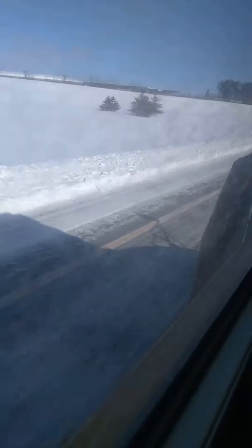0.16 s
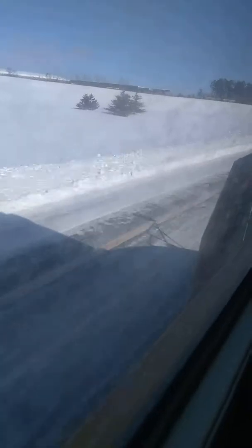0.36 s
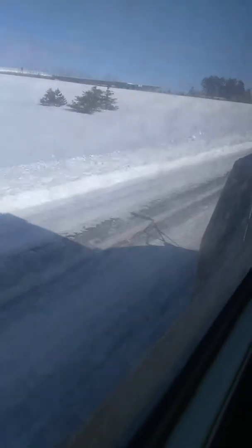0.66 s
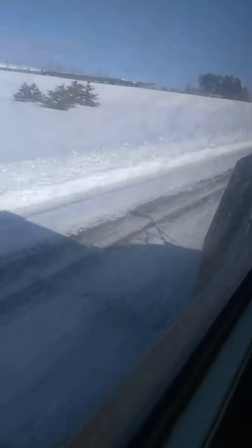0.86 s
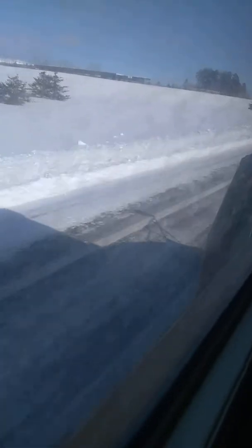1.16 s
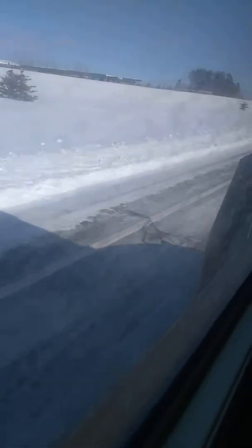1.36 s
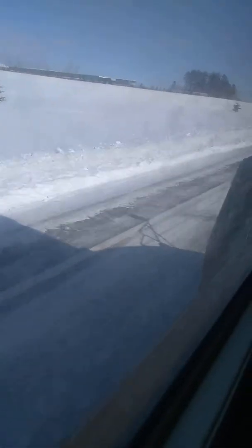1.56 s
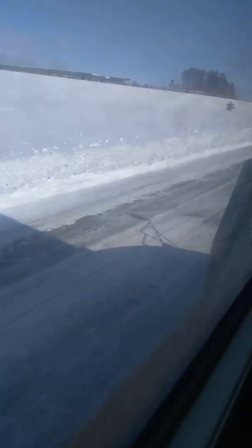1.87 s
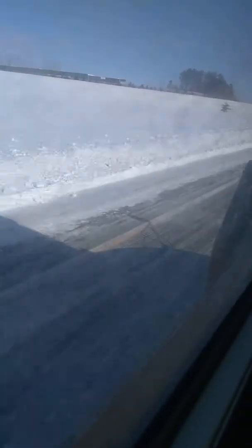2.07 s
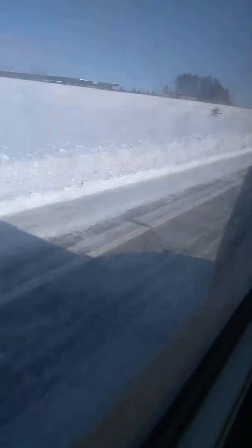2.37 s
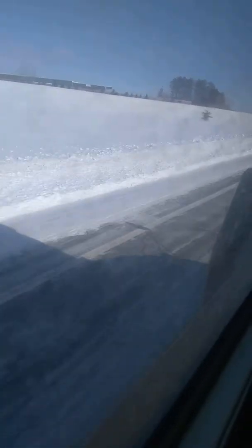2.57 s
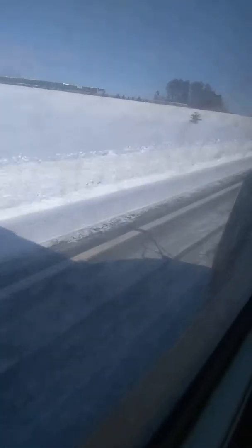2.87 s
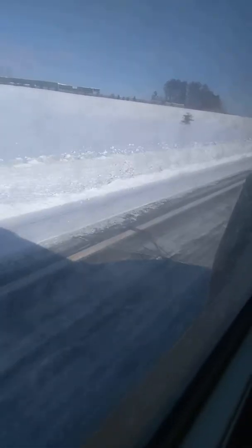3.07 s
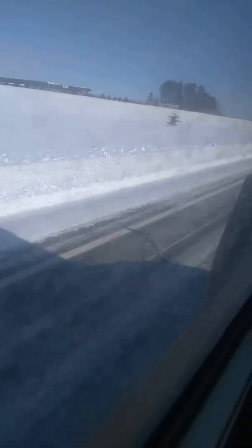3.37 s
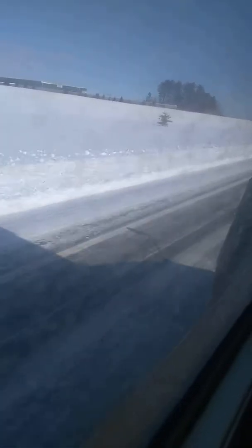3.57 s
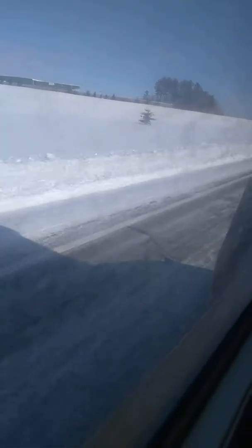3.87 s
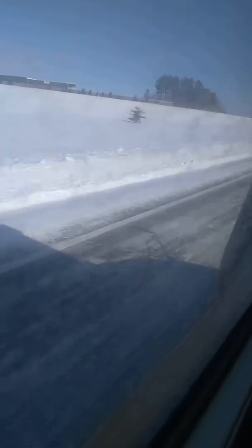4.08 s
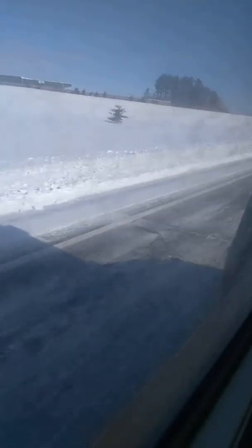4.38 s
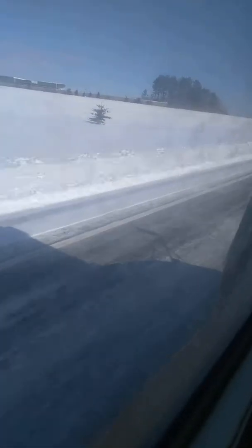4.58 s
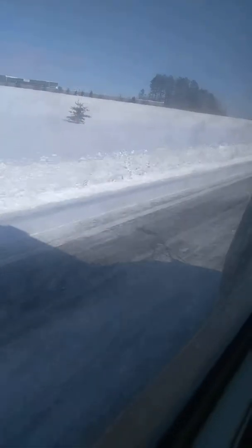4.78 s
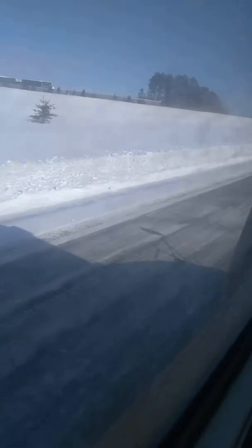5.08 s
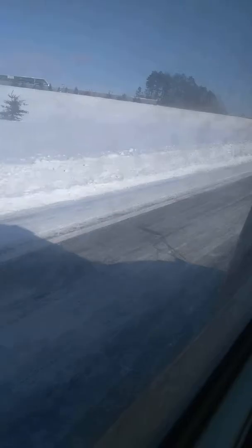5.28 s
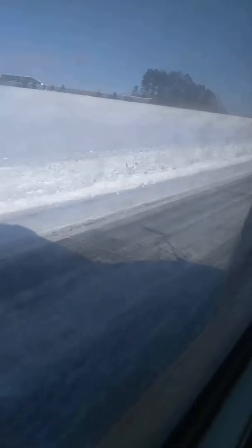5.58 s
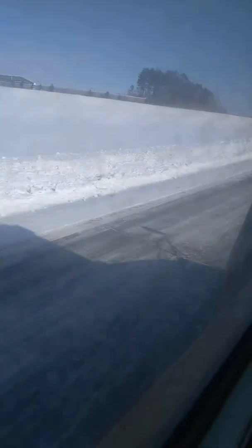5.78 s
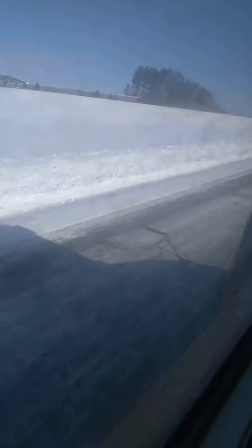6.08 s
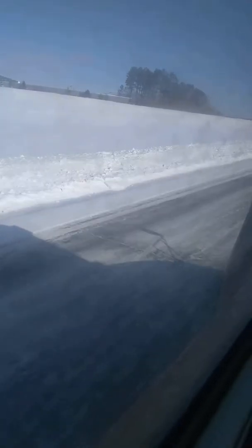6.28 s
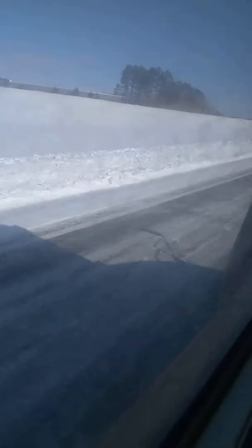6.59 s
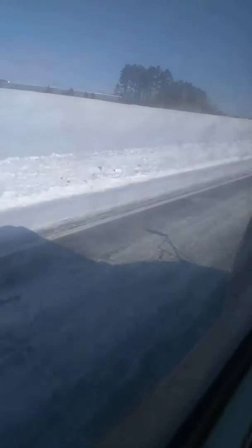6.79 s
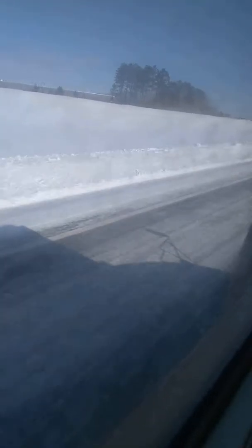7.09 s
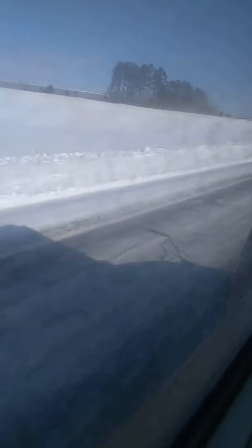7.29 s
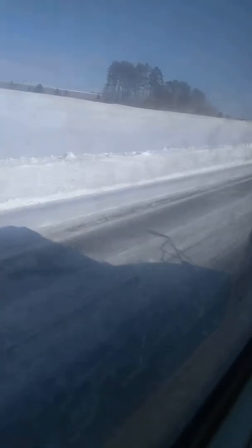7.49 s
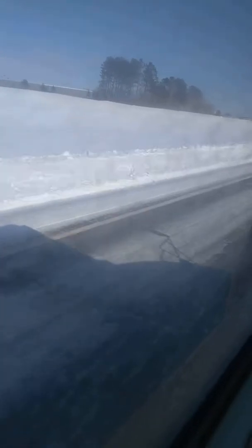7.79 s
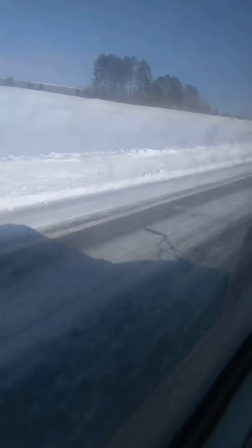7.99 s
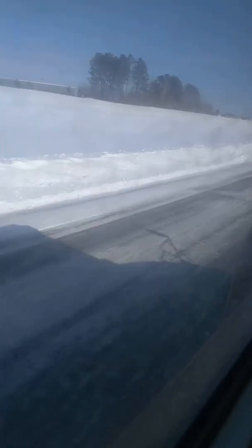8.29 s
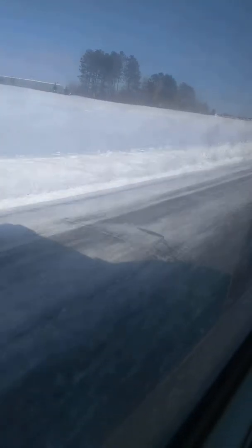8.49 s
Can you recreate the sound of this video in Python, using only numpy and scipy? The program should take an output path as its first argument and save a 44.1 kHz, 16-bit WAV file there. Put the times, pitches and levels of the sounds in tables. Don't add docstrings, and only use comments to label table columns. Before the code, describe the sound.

Inside a bus cruising a snowy highway, steady tyre rumble and engine hum with ticking trim, two sharp grit cracks, then the engine pulling briefly.

```python
import sys
import numpy as np
from scipy import signal
from scipy.fft import rfft, irfft
from scipy.io import wavfile
from scipy.ndimage import uniform_filter1d

SR = 44100
rng = np.random.default_rng(int(sys.argv[2]) if len(sys.argv) > 2 else 0)


def pcm_store(signal):
    levels = np.round(np.clip(np.atleast_2d(signal), -1, 1) * 32767)
    wavfile.write(sys.argv[1], SR, levels.astype(np.int16).T)


def voltage_ratio(decibels):
    exponent = np.asarray(decibels, float) / 20
    return 10 ** exponent


N = 381024


def evened(x):
    return x / np.sqrt(np.mean(x ** 2) + 1e-20)


def read(points, hz):
    f, value = np.transpose(points)
    return np.interp(np.log(hz + 1), np.log(f + 1), value)


def curve(points, t):
    return np.interp(t, *np.transpose(points))


def drift(size):
    return evened(uniform_filter1d(uniform_filter1d(rng.standard_normal(N), size), size))


def resonate(x, hz, width_hz):
    turn = np.exp(2j * np.pi * hz * np.arange(x.shape[-1]) / SR)
    r = np.exp(-np.pi * width_hz / SR)
    return 2 * (turn * signal.lfilter([1 - r], [1, -r], x / turn)).real


def twice_resonated(noise, modes):
    return sum(voltage_ratio(db) * evened(resonate(resonate(noise, hz, width_hz), hz, width_hz))
               for hz, width_hz, db in modes)


def band(x, lo_hz, hi_hz):
    return signal.sosfilt(signal.butter(3, [lo_hz, min(hi_hz, SR / 2 - 100)], "band", fs=SR, output="sos"), x)


def add(mix, s, sound):
    part = mix[:, round(s * SR):][:, :sound.shape[1]]
    part += sound[:, :part.shape[1]]


def wash(shape_db, ref_hz, patchy_db, gust_db):
    frames = N // 256 + 5
    a, b, c, d, patches = rng.standard_normal((frames, 513, 5)).T
    patches = evened(uniform_filter1d(uniform_filter1d(patches, size=10, axis=0), size=12, axis=1))
    gusts = evened(uniform_filter1d(rng.standard_normal(frames), size=5))
    z = np.array([a + 1j * b, c + 1j * d]) * voltage_ratio(patchy_db * patches + gust_db * gusts)
    x = signal.istft(z, nperseg=1024, noverlap=768)[1][:, :N]
    hz = np.fft.rfftfreq(N, 1 / SR)
    spectrum = rfft(x) * voltage_ratio(shape_db(hz))
    inside = (hz > ref_hz[0]) & (hz < ref_hz[1])
    return irfft(spectrum, N) * N / np.sqrt(2 * np.sum(abs(spectrum[0, inside]) ** 2))


def road(t):
    # start_s, level_db
    roar_level = [(0, -39.5), (.6, -37.5), (1.5, -37), (1.8, -38.5), (2.05, -36.5), (2.6, -38.5),
                  (3.2, -37.5), (3.8, -38), (3.88, -42), (4, -38.5), (5.2, -37.5), (5.6, -37), (6.8, -38.5),
                  (7.1, -42), (7.4, -43), (7.8, -40), (8.15, -41), (8.64, -38.5)]
    # freq_hz, density_db
    rumble = [(21, -38), (32, -18.5), (64, -3.5), (172, -5), (247, -11.0), (269, -14), (398, -18),
              (430, -18.5), (506, -26.5), (538, -22.5), (742, -26), (807, -25.5), (882, -23.5), (1496, -33)]
    # freq_hz, density_db
    hiss = [(904, -2), (1636, -8.5), (2228, -7), (2723, -5.5), (3897, -17.5), (4457, -22), (5071, -18),
            (6492, -26), (8042, -27.5), (9980, -34.5), (11466, -35.5), (12995, -39)]
    # freq_hz, width_hz, level_db (re roar)
    whines = [(2045, 30, -21), (2765, 25, -20)]

    def low_db(hz):
        return read(rumble, hz) - 40 * np.clip((hz - 250) / 200, 0, 2) ** 2

    def mid_db(hz):
        below = 40 * np.clip((330 - hz) / 150, 0, 2) ** 2
        above = 40 * np.clip((hz - 1200) / 600, 0, 2) ** 2
        return read(rumble, hz) - below - above

    def top_db(hz):
        below = 40 * np.clip((1500 - hz) / 600, 0, 2) ** 2
        above = 60 * np.clip((hz - 14000) / 500, 0, 2)
        return read(hiss, hz) - below - above

    low = voltage_ratio(9.8) * wash(low_db, (40, 140), patchy_db=0.53, gust_db=.6)
    mid = voltage_ratio(0.06) * wash(mid_db, (400, 1800), patchy_db=0.87, gust_db=0.91)
    top = voltage_ratio(-6.7) * wash(top_db, (2300, 4000), patchy_db=1.04, gust_db=0.98)
    return voltage_ratio(curve(roar_level, t)) * (low + mid + top + twice_resonated(rng.standard_normal((2, N)), whines))


def engine(t):
    # start_s, turns_per_s
    speed = [(0, 38.9), (3, 38.6), (5.5, 38.1), (6.7, 37.6), (7.3, 37.15), (8.1, 36.55), (8.64, 36.2)]
    orders = (3.36, 4.41, 5, 6, 7, 9, 21)
    # cruise_db, cruise_slope_db_per_s, pull_db, pull_slope_db_per_s
    order_levels = [(-34, -1.2, -45, -3), (-37.5, 2.5, -31, -1), (-35.5, -.4, -24.5, -1),
                    (-45, 1.8, -28, 2.5), (-55, 4.4, -37, 7), (-52, -1, -35, -4), (-60, 2.1, -66, -1)]
    # centre_s, order, level_db, half_length_s
    jolts = [
        (6.685, 5.12, -15.5, .035),
        (8.29, 6, -22, .11),
        (8.53, 4.41, -29, .07),
    ]
    pull_from_s, pull_to_s, pull_rise_s, pull_fall_s = 6.7, 8.1, .18, .12
    settle_s, lift_off_db = 4., -6

    angle, out = 2 * np.pi * np.cumsum(curve(speed, t)) / SR, np.zeros((2, N))
    quarter = np.array([[0], [np.pi / 2]])
    rise, fall = (t - pull_from_s) / pull_rise_s, 1 + (pull_to_s - t) / pull_fall_s
    pull = np.clip(np.minimum(rise, fall), 0, 1)
    for order, (cruise_db, cruise_slope, pull_db, pull_slope) in zip(orders, order_levels):
        waver_rad = .25 * drift(size=5000)
        cruise = cruise_db + cruise_slope * np.minimum(t, settle_s)
        cruise = cruise + lift_off_db * (t > pull_to_s) + 1.3 * drift(size=1200)
        level = (1 - pull) * voltage_ratio(cruise) + pull * voltage_ratio(pull_db + pull_slope * (t - pull_from_s))
        out += level * voltage_ratio(3 + 2.1 * drift(size=3000)) * np.cos(order * angle + waver_rad + quarter)
    for s, order, db, half_s in jolts:
        swell = np.cos(np.clip((t - s) / half_s, -1, 1) * np.pi / 2) ** 2
        out += voltage_ratio(db + 3) * swell * np.cos(order * angle + quarter)
    return out


def cracks():
    # start_s, peak_db, body_hz, bright_db, low_db
    hits = [
        (5.6252, -1.5, 3200, -18.5, -13),
        (6.0475, -1.5, 3010, -18, -7),
    ]
    out, t = np.zeros((2, N)), np.arange(2600) / SR
    side_rad = np.array([[0], [1.5]])
    for s, db, hz, bright_db, low_db in hits:
        noise = rng.standard_normal((3, 2, len(t)))
        rise = np.minimum(t / 0.0003, 1) ** 2
        body = np.sin(2 * np.pi * hz * t + side_rad) * voltage_ratio(-60 * t / .0036)
        low = np.sin(2 * np.pi * 1180.0 * t) + .8 * np.sin(2 * np.pi * 2350. * t + side_rad)
        low = voltage_ratio(low_db - 60 * t / 0.0064) * low
        bright = voltage_ratio(bright_db - 60 * t / 0.0086) * evened(band(noise[0], 3400.0, 14000.0))
        snap = (body + low + bright) * rise
        snap = snap + voltage_ratio(-15.5) * np.roll(snap, 270, axis=1)
        scatter = evened(band(noise[1], 1000., 5100.0)) + voltage_ratio(-14.) * evened(band(noise[2], 4100.0, 13000.))
        scatter_db = -26. - 60 * np.maximum(t - .008, 0) / 0.02 - 600 * t
        add(out, s, voltage_ratio(db) * (snap + voltage_ratio(scatter_db) * rise * scatter))
    return out


def ticks(rows, ring_hz, knock_db):
    ring_spread, dull_t60_s, t60_s_per_db = .06, .021, .0003
    out, t = np.zeros((2, N)), np.arange(2600) / SR
    for s, db, bright_db in rows:
        noise = rng.standard_normal((3, 2, len(t)))
        detune, phase = rng.random((2, 2, 1))
        hz = ring_hz * (1 + ring_spread * (rng.random() - .5))
        t60_s = np.clip(dull_t60_s - t60_s_per_db * (bright_db + 38), .004, .2)
        fall = voltage_ratio(-60 * t / t60_s) * np.minimum(t / 0.0008, 1) ** 2
        ring = np.sin(2 * np.pi * hz * t + 6 * phase)
        ring = ring + 0.46 * np.sin(2 * np.pi * (6000 - hz + 200 * detune) * t)
        bright = voltage_ratio(bright_db + 1.5) * evened(band(noise[1], 3100.0, 9000.0))
        knock = voltage_ratio(knock_db - 1.5) * evened(band(noise[2], 790.0, 2100.))
        crisp = voltage_ratio(-5.) * evened(band(noise[2, ::-1], 2000., 3800.))
        snap = (.7 * ring + crisp + bright + knock) * fall
        snap = snap + voltage_ratio(-15.0) * np.roll(snap, 270, axis=1)
        tail = band(noise[0], 2100., 4300.) + voltage_ratio(bright_db - 4.) * band(noise[1, ::-1], 3000., 13000.)
        tail = voltage_ratio(-5.5 - 60 * t / 0.026) * evened(tail)
        add(out, s, voltage_ratio(db + 3.) * (snap + tail * np.minimum(t / 0.004, 1)))
    return out


def side_panel():
    # start_s, peak_db, bright_db
    rows = [(.1141, -45, -19), (.292, -32, -29), (.4718, -36, -22.5), (.5521, -28, -29),
            (.7125, -26.5, -34), (.7626, -23, -38), (.9667, -31, -34), (1.0894, -36, -22),
            (1.1578, -38, -13), (1.2096, -40, -17), (1.3481, -27.5, -32), (1.5837, -25, -26),
            (1.8053, -36, -21), (1.9402, -28, -28), (1.9935, -26, -15), (2.1415, -34, -26.5),
            (2.4658, -24.5, -38), (2.6439, -35, -14), (2.812, -33, -25), (2.8679, -38, -20),
            (5.1108, -31, -19), (5.2548, -32, -14), (5.7274, -29, -28), (8.2634, -32.5, -25),
            (8.4043, -30, -18), (8.421, -25, -8), (8.4814, -38, -10)]
    return ticks(rows, ring_hz=2700, knock_db=-4)


def window_frame():
    # start_s, peak_db, bright_db
    rows = [(.213, -31.5, -14), (1.4356, -30, -14), (1.4531, -33, -14), (3.083, -34.5, -14),
            (3.1416, -28, -27), (3.5377, -37, -17.5), (3.701, -27, -15), (5.376, -29, -29),
            (5.4894, -33, -6), (5.7808, -31, -14), (6.1506, -33, -31.5), (6.8635, -33.5, -25),
            (7.2182, -30.5, -34), (7.2741, -31, -35), (7.5116, -39, -10), (7.6987, -28, -30),
            (7.7665, -35, -31), (8.3252, -38, -18), (8.5268, -25.5, -24), (8.5607, -32, -16)]
    return ticks(rows, ring_hz=3230, knock_db=-9)


def chatter():
    # first_turn_s, last_turn_s, peak_db
    bouts = [(1.305, 1.9, -53), (2.04, 2.07, -58), (2.2, 3.0, -56), (3.075, 3.4, -54), (3.48, 3.57, -58),
             (4.615, 5.2, -55), (5.345, 5.6, -55), (5.92, 5.95, -58), (6.757, 7.1, -57), (7.39, 7.6, -58),
             (7.735, 8.15, -58), (8.27, 8.5, -62), (8.6, 8.63, -51)]
    # freq_hz, width_hz, level_db
    modes = [(13280, 250, -9), (13520, 200, -5), (13750, 160, -3), (14000, 300, -4.5)]
    wheel_turn_s, bout_edge_db, turn_spread_db = .0798, -7, 2.2
    squeak_hz, squeak_fall_hz, squeak_s, squeak_db = 13850, 650, .04, -.7

    shake, squeaks, t = np.zeros((2, N)), np.zeros((2, N)), np.arange(5000) / SR
    done = np.minimum(t / squeak_s, 1)
    rise = np.sin(np.minimum(t / .012, 1) * np.pi / 2) ** 2
    for first, last, peak_db in bouts:
        chance = rng.standard_normal(size=(20, 2))
        for s, (luck, tune) in zip(np.arange(first, last, wheel_turn_s), chance):
            off_centre = 2 * (s - first) / (last - first) - 1
            db = peak_db + bout_edge_db * off_centre ** 2 + turn_spread_db * luck
            add(shake, s - .008, voltage_ratio(db - 60 * t / .22)[None] * rise)
            hz = squeak_hz + 90 * tune - squeak_fall_hz * done
            squeak = np.sin(np.pi * done ** .6) * np.sin(2 * np.pi * np.cumsum(hz) / SR)
            add(squeaks, s - .008, voltage_ratio(db + squeak_db) * squeak[None])
    noise = rng.standard_normal((2, N))
    rough = .6 + .8 * evened(uniform_filter1d(noise[::-1], size=100))
    return voltage_ratio(-1.2) * shake * twice_resonated(noise, modes) + rough * squeaks


def grit():
    hits_per_s, level_db = 50, -59
    t = np.arange(300) / SR
    hits = (rng.random(N) < hits_per_s / SR) * voltage_ratio(level_db + 4.5 * np.minimum(rng.exponential(1, N), 3))
    burst = signal.oaconvolve(hits, voltage_ratio(-60 * t / .012))[:N]
    return burst * evened(band(rng.standard_normal((2, N)), 2500., 7500.))


def ports(pair):
    # freq_hz, likeness_0_to_1
    likeness = [(80, 0.6), (215, 0.92), (516, 0.28), (900, 1), (1421, 0.067), (2050, .9), (3150, 0.79),
                (3700, .63), (4280, 0.96), (4780, .42), (5350, .8), (6000, 0.58), (6500, 0.75), (7150, .3)]
    # freq_hz, left_above_right_db
    left_db = [(43, 6.5), (333, 0), (495, -3.5), (1162, 0.4), (6546, 3.5), (9776, 8), (10099, 17),
               (11735, 13), (13038, 25), (13318, 5), (14104, 20.5), (14298, 4)]
    # freq_hz, left_lead_rad
    lead_rad = [(0, 0), (480, -1.0), (540, .2), (1250, 0), (1450, 2.9), (1700, 2.4), (2200, 3.14),
                (4350, 9.4), (6550, 15.7), (14600, 38.5)]
    hz, (left, other) = np.fft.rfftfreq(N, 1 / SR), rfft(pair)
    same = np.clip(curve(likeness, hz), 0, 1)
    shift = np.exp(-1j * curve(lead_rad, hz)) * voltage_ratio(-read(left_db, hz))
    right = shift * (same * left + np.sqrt(1 - same ** 2) * other)
    return irfft(np.array([left, right]), N)


def scene():
    t = np.arange(N) / SR
    return ports(road(t) + engine(t) + cracks() + side_panel() + window_frame() + chatter() + grit())


def gain_control():
    # start_s, depth_db
    ducks = [
        (5.627, 9.5),
        (6.049, 7.5),
    ]
    fall_s, recover_db_per_s = .008, 10.5
    t = np.arange(N) / SR
    dips_db = [np.clip((t - s) / fall_s, 0, 1) * np.maximum(db - recover_db_per_s * (t - s), 0)
               for s, db in ducks]
    return voltage_ratio(-np.max(dips_db, axis=0))


def joint_gate(x, under_db, count):
    settings = dict(nperseg=2048, noverlap=1024, window="cosine")
    z = signal.stft([x[0] + x[1], x[0] - x[1]], **settings)[2]
    edges = np.geomspace(36, 700, count).astype(int)
    for lo, hi in zip(edges, edges[1:]):
        power = (abs(z[:, lo:hi]) ** 2).mean(1)
        limit = voltage_ratio(-2 * np.interp(lo, [100, 200], under_db))
        z[:, lo:hi] *= (power > power[::-1] * limit)[:, None]
    total, apart = signal.istft(z, **settings)[1][:, :N]
    return np.array([total + apart, total - apart]) / 2


def band_limit(x):
    return signal.sosfilt(signal.butter(12, 15020, fs=SR, output="sos"), x)


def record(dry):
    dry = signal.sosfilt(signal.butter(2, 38., "high", fs=SR, output="sos"), dry) * gain_control()
    edged = signal.oaconvolve(dry, signal.firwin(255, 14250., window=("kaiser", 6), fs=SR)[None], "same")
    gated = joint_gate(edged, under_db=[12., 6.5], count=46)
    return band_limit(gated)


dry = scene()
out = record(dry)
pcm_store(out)
```